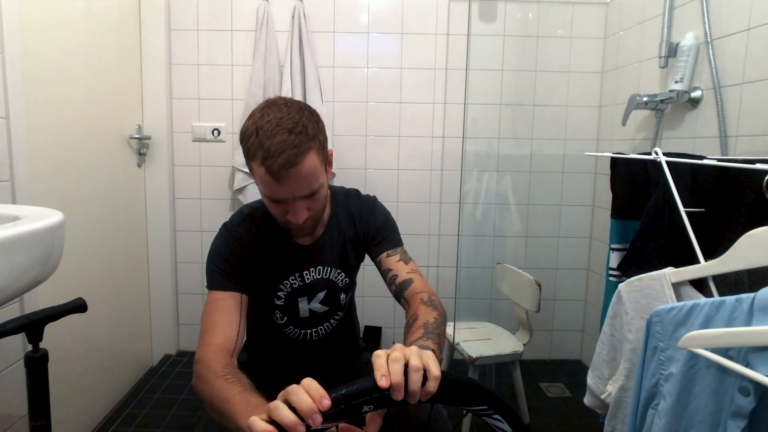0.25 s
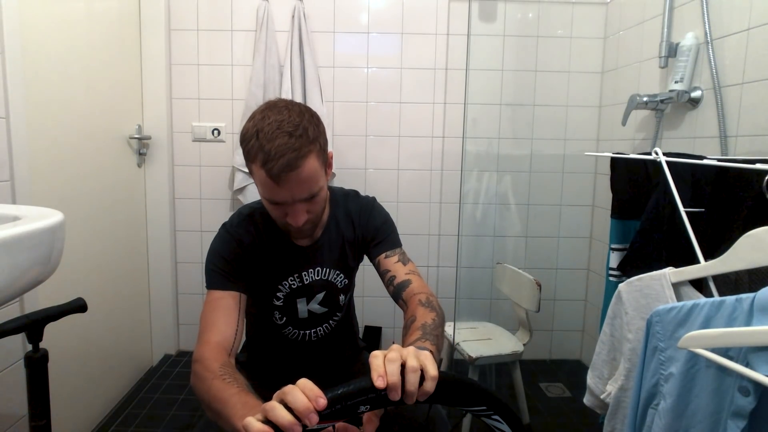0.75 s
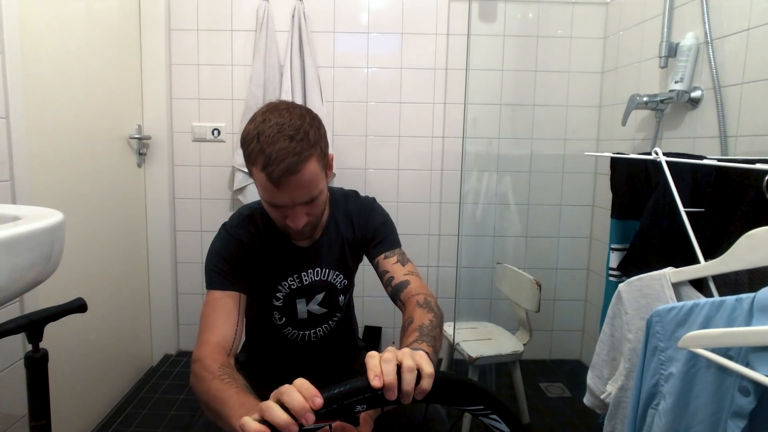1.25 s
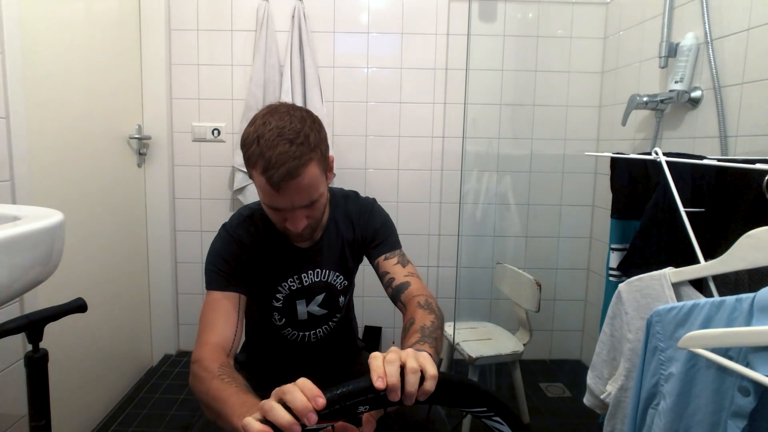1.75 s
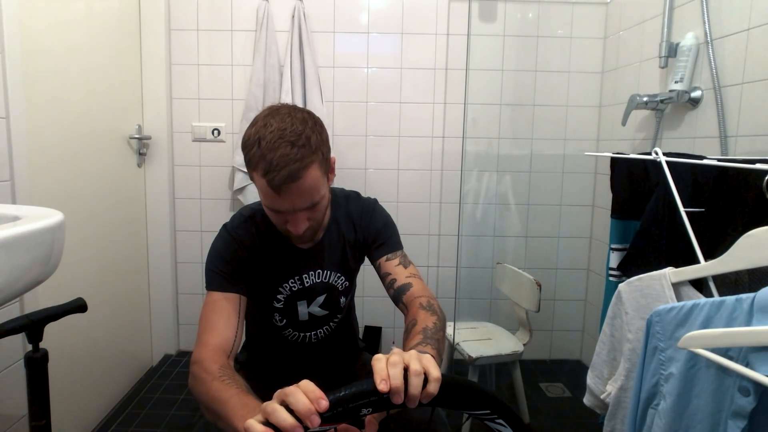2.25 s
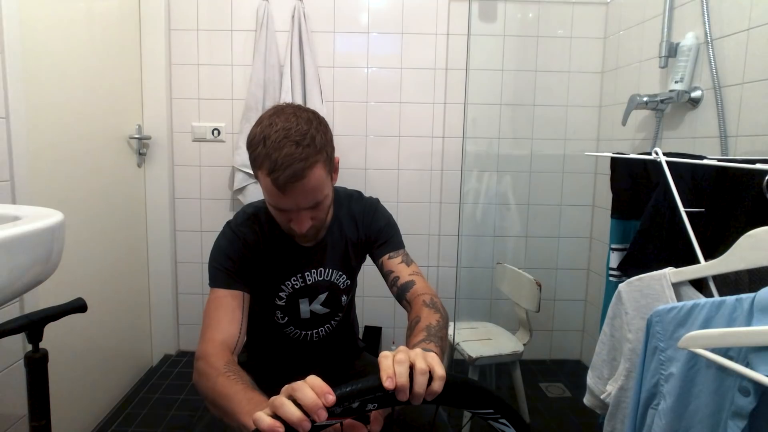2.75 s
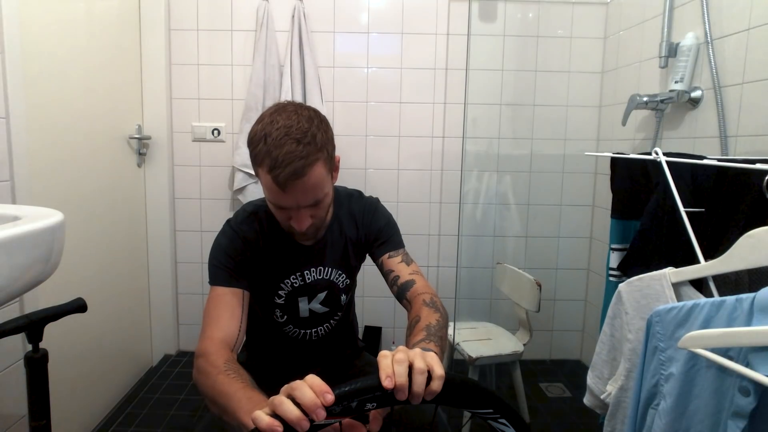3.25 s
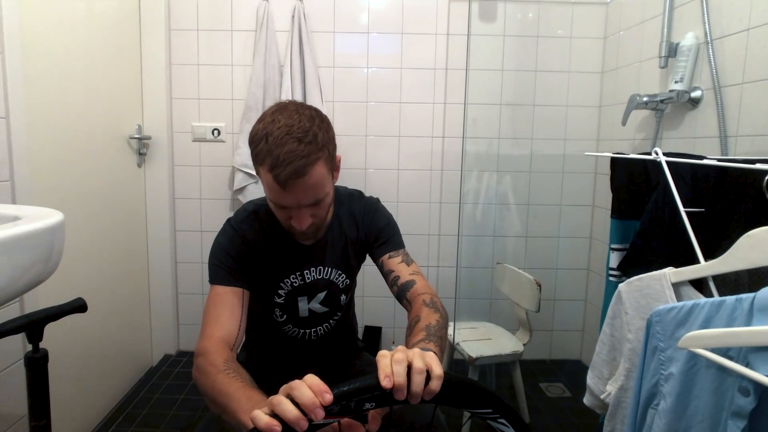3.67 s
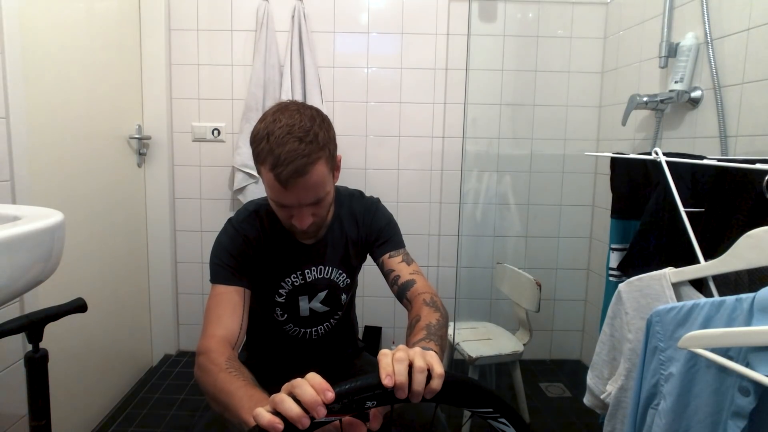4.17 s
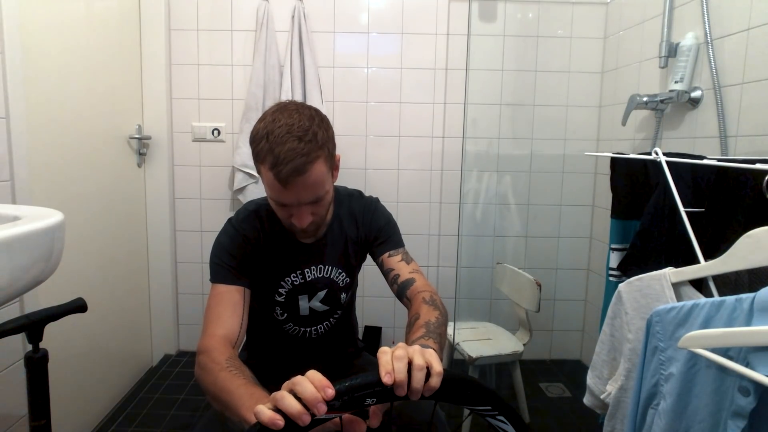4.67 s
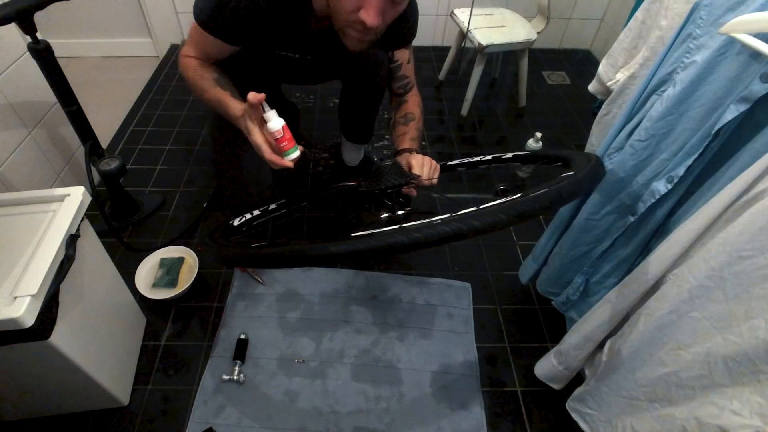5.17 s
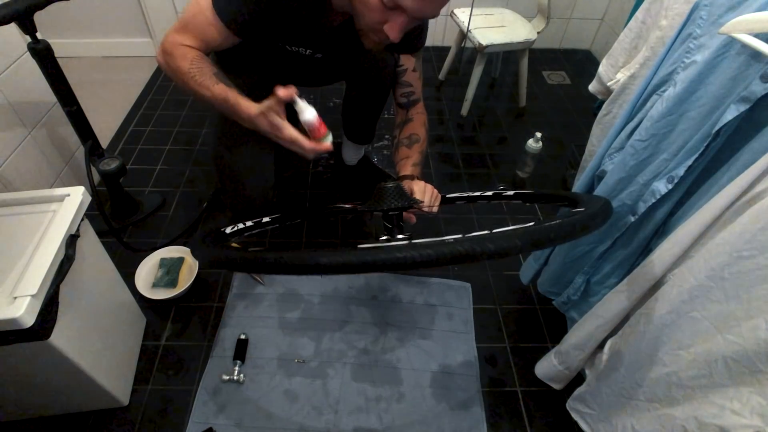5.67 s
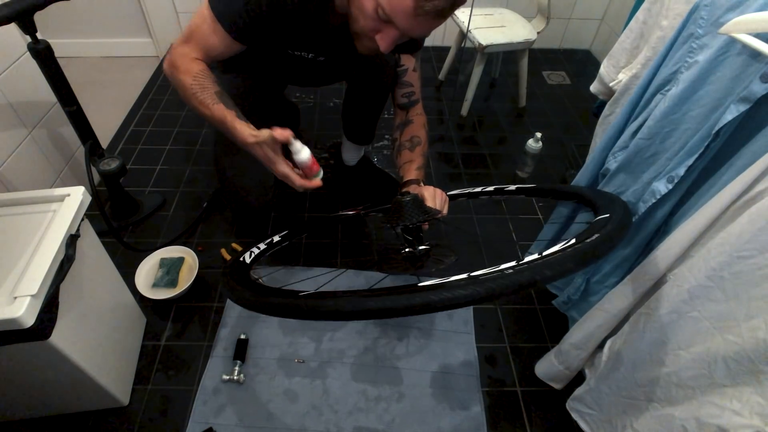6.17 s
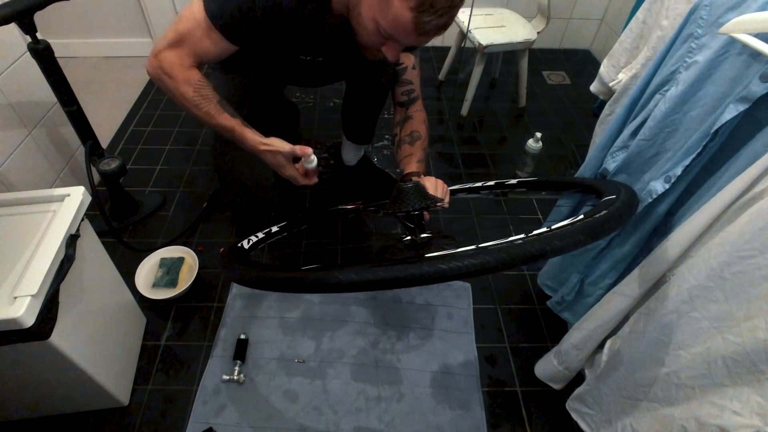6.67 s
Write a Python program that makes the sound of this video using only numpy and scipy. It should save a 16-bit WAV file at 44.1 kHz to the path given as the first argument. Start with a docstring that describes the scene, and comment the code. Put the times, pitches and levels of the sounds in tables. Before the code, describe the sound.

Air spurts, then hisses from a bicycle tyre valve with a sinking whistle, before a small bottle of liquid is shaken in a bathroom.

```python
"""Two short spurts of air leave a bicycle tyre in a tiled bathroom, then a long hiss: turbulence at the
valve, with a breathy whistle of eddies off the pin that climbs as the valve opens and sinks as the tyre
empties. The pin clicks shut and the wheel squeaks faintly as a hand sticks and slips on it. Last, a small
bottle of sealant is shaken, about ten strokes a second: the liquid slaps, trapped air gulps, froth fizzes.
The sound is mono."""
import sys
import numpy as np
from scipy import signal
from scipy.fft import rfft, irfft
from scipy.io import wavfile

SR = 44100
rng = np.random.default_rng(int(sys.argv[2]) if len(sys.argv) > 2 else 0)


def pcm_store(signal):
    """Save signal as 16-bit PCM."""
    levels = np.round(np.clip(np.atleast_2d(signal), -1, 1) * 32767)
    wavfile.write(sys.argv[1], SR, levels.astype(np.int16).T)


N = 305613
TIME = np.arange(N) / SR


def from_db(db):
    """Decibels to gain."""
    return 10 ** (np.asarray(db) / 20)


def rms_one(x):
    """Scale to unit power."""
    return x / np.sqrt(np.mean(x ** 2) + 1e-20)


def automation(points):
    """Draw straight lines through (time, value) points, one value per sample."""
    times, values = np.transpose(points)
    return np.interp(TIME, np.sort(times), values)


def at_hz(points, hz):
    """Read a curve along log frequency."""
    freqs, values = np.transpose(points)
    return np.interp(np.log(np.maximum(hz, 1)), np.log(freqs), values)


def colour(x, spectrum):
    """Shape a signal with an EQ curve; unit power."""
    eq = from_db(at_hz(spectrum, np.fft.rfftfreq(N, 1 / SR)))
    return rms_one(irfft(rfft(x) * eq, N))


def noise(spectrum):
    """Noise shaped by an EQ curve; unit power."""
    return colour(rng.standard_normal(N), spectrum)


def band_noise(length, low_hz, high_hz):
    """Gently band-passed noise; unit power."""
    bandpass = signal.butter(2, [low_hz, high_hz], "band", fs=SR, output="sos")
    return rms_one(signal.sosfilt(bandpass, rng.standard_normal(length)))


def drift(rate_hz):
    """Smooth random modulation up to a given rate; unit power."""
    lowpass = signal.butter(2, rate_hz, fs=SR, output="sos")
    return rms_one(signal.sosfilt(lowpass, rng.standard_normal(N + SR))[SR:])


def gate(start_s, end_s, ramp_s):
    """Fully open between two times, with fades outside them."""
    fade_in = np.clip((TIME - start_s) / ramp_s + 1, 0, 1) ** 2
    fade_out = np.clip((end_s - TIME) / ramp_s + 1, 0, 1) ** 2
    return fade_in * fade_out


def low_cut(x, hz):
    """Roll off the bass, which small things do not radiate."""
    return signal.sosfilt(signal.butter(3, hz, "high", fs=SR, output="sos"), x)


def ring(clicks, hz, t60_s):
    """A unit click sets a sine of height 1 ringing."""
    radius, angle = np.exp(-np.log(1000) / (t60_s * SR)), 2 * np.pi * hz / SR
    return signal.lfilter([0, np.sin(angle)], [1, -2 * radius * np.cos(angle), radius ** 2], clicks + 1e-18)


def strike(hits, modes):
    """Each (time_s, level_db) hit rings all the modes of an object."""
    force = np.zeros(N)
    for time_s, db in hits:
        force[round(time_s * SR)] = from_db(db)
    return sum(from_db(db) * ring(force, hz, t60_s) for hz, db, t60_s in modes)


def add(track, sound, start_s):
    """Mix a short sound in from a given time."""
    start = round(start_s * SR)
    track[start:start + len(sound)] += sound[:N - start]


# EQ of the still room: freq_hz, gain_db
ROOM_TONE_EQ = [(25, -17), (49, 2.5), (70, -2), (150, -4), (400, -6.5), (1500, -10.5), (4000, -22),
                (16000, -31)]
def room_tone(level_db=-68):
    """A very quiet, dark bed of noise."""
    return from_db(level_db) * noise(ROOM_TONE_EQ)


# EQ of the rustle: freq_hz, gain_db
RUSTLE_EQ = [(22, -30), (50, 2), (90, -8), (250, -6.5), (520, -10), (900, -15), (1600, -13.5), (2200, -18),
             (2900, -16.5), (4000, -25.5), (9600, -22), (16000, -31)]
def rustle(level_db=-53, start_s=5.025, swell_s=0.05, unrest_db=1.5):
    """The soft noise of someone moving about swells in and stays."""
    swell = np.sqrt(np.clip((TIME - start_s) / swell_s, 0, 1))
    return from_db(level_db + unrest_db * drift(14)) * noise(RUSTLE_EQ) * swell


# Reverb time of the tiled room: freq_hz, t60_s
TILE_DECAY = [(200, 0.75), (530, 0.48), (1400, 0.45), (3700, 0.39), (9700, 0.3), (15000, 0.2)]
def tile_echoes(predelay_s=0.002):
    """One second of dense echoes whose treble dies first; unit energy."""
    t, hz = TIME[:SR], np.fft.rfftfreq(SR, 1 / SR)
    spectrum, tail = rfft(rng.standard_normal(SR)), np.zeros(SR)
    edges = np.geomspace(20, SR / 2, num=15)
    for low, high in zip(edges, edges[1:]):
        t60_s = at_hz(TILE_DECAY, np.sqrt(low * high))
        band = irfft(spectrum * ((hz >= low) & (hz < high)), SR)
        tail += band * np.exp(-np.log(1000) * t / t60_s)
    tail *= t > predelay_s
    return tail / np.linalg.norm(tail)


def bathroom(x, wet_db, shift_rad=1.4):
    """Direct sound plus echoes, crossfading between two patterns as the source shifts in the hands."""
    angle, wet = shift_rad * drift(3.65), from_db(wet_db)
    first, second = (signal.fftconvolve(x, tile_echoes())[:N] for _ in range(2))
    echoes = np.cos(angle) * first + np.sin(angle) * second
    return (x + wet * echoes) / np.hypot(1, wet)


# Finger scratches: start_s, level_db, pitch_hz, decay_s
SCRATCHES = [(5.196, -46, 3500, 0.0016), (5.203, -49, 6000, .005), (5.28, -44, 2800, 0.003),
             (5.331, -50, 3940, 0.018), (5.358, -48, 10000, 0.017)]
def scratches(spread=1.4):
    """Fingers scrape over the bottle in short, faint rasps."""
    out, t = np.zeros(N), TIME[:SR // 8]
    for start_s, db, hz, decay_s in SCRATCHES:
        rasp = band_noise(len(t), hz / spread, hz * spread)
        add(out, from_db(db) * rasp * np.exp(-t / decay_s), start_s)
    return out


# Fader of the squeak: time_s, level_db
SQUEAK_FADER = [(5.0, -110), (5.012, -56.5), (5.032, -55.5), (5.043, -44), (5.12, -53.5), (5.14, -65),
                (5.17, -110)]
# Modes of the wheel: pitch_hz, gain_db
WHEEL_MODES = [(1362, -1.5), (1464, 2.5), (2250, -17.5), (2794, -19), (3225, -11.5), (8533, -21)]
def wheel_squeak(wobble=0.0038, rough_db=1.5):
    """Skin sticks and slips on the wheel and keeps a few of its modes sounding."""
    warped_time = np.cumsum(1 + wobble * drift(60)) / SR
    modes = sum(from_db(db + rough_db * drift(70)) * np.sin(2 * np.pi * hz * warped_time)
                for hz, db in WHEEL_MODES)
    return rms_one(modes) * from_db(automation(SQUEAK_FADER))


# The hand's hit on the tyre: start_s, force_db
TYRE_HITS = [(.168, -36.5)]
# Modes of the tyre: pitch_hz, gain_db, t60_s
TYRE_MODES = [(139, -30, 0.13), (245, -23.5, 0.15), (353, -2, 0.056), (450, 13.5, 0.013),
              (630, 11.5, 0.0099), (1147, 2.5, 0.057), (1280, -12.5, 0.44)]
def tyre_bump(trim_db=-4):
    """The hand bumps the tyre, which answers with a short knock."""
    return from_db(trim_db) * low_cut(strike(TYRE_HITS, TYRE_MODES), hz=85)


# Clicks of the valve pin: start_s, crack_db, ring_db
PIN_CLICKS = [(.41, -53, -60), (0.426, -42, -54), (.539, -43, -46), (4.807, -37, -45.5)]
# Modes of the pin: pitch_hz, gain_db, t60_s
PIN_MODES = [(1122, 1.5, 0.14), (1740, -6, .15), (1990, 8.5, 0.093), (2487, 6, 0.12)]
def pin_clicks(ring_trim_db=-11, crack_trim_db=-5, decay_s=0.019):
    """The valve pin clicks: a gritty crack over a small ring."""
    hits = [(start_s, ring_db) for start_s, _, ring_db in PIN_CLICKS]
    out, t = from_db(ring_trim_db) * strike(hits, PIN_MODES), TIME[:SR // 20]
    for start_s, crack_db, _ in PIN_CLICKS:
        crack = band_noise(len(t), 1130, 4500) * np.exp(-t / decay_s)
        add(out, from_db(crack_db + crack_trim_db) * crack, start_s)
    return out


SHAKE_FROM_S, PREROLL_S = 5.53, 0.03
def burst(low_hz, high_hz, swell_s, decay_s):
    """A puff of noise that swells to its peak, PREROLL_S after its start, and collapses."""
    t = TIME[:SR // 8] - PREROLL_S
    envelope = np.exp(np.minimum(t, 0) / swell_s - np.maximum(t, 0) / decay_s)
    return band_noise(len(t), low_hz, high_hz) * envelope


# Strokes of the bottle: peak_s, slap_db, pitch_hz, spray_db, gulp_db, decay_s, froth_db
STROKES = [(5.5403, -33.5, 2870, -41.5, -39.5, 0.0049, -34.5), (5.63, -26, 1280, -40.5, -42, 0.0032, -35.5),
           (5.7354, -28, 3100, -34.5, -38.5, 0.002, -35), (5.8136, -33.5, 3070, -49, -69, 0.004, -34),
           (5.9254, -31.5, 1380, -46.5, -44.5, 0.0044, -40), (5.998, -43, 2010, -51, -67, 0.0061, -36.5),
           (6.1133, -27, 2700, -40.5, -53, 0.0025, -39), (6.1956, -26.5, 2280, -43.5, -47, 0.005, -36.5),
           (6.2958, -25, 1440, -41.5, -43.5, 0.0034, -37), (6.3866, -33, 1740, -47, -42, 0.0047, -38),
           (6.4887, -27, 1880, -50, -51, 0.0068, -38), (6.5754, -32, 2800, -49, -58, 0.0063, -39),
           (6.6616, -32.5, 1990, -44, -63, 0.003, -33), (6.7627, -31, 2480, -45.5, -44.5, 0.0055, -43),
           (6.8404, -27.5, 1830, -43.5, -49, 0.0013, -47)]
def slaps(pop_trim_db=-3.5, spray_trim_db=3.5, splash_trim_db=-6, spread=1.23):
    """Sealant slaps the bottle: a pitched pop and fine spray, then a longer, softer splash."""
    out = np.zeros(N)
    for peak_s, slap_db, hz, spray_db, _, decay_s, _ in STROKES:
        swell_s = 1.18 * decay_s
        pop = from_db(slap_db + pop_trim_db) * burst(hz / spread, hz * spread, swell_s, decay_s)
        spray = from_db(spray_db + spray_trim_db) * burst(7100, 11500, swell_s, decay_s)
        splash = from_db(slap_db + splash_trim_db) * burst(410, 3170, swell_s, decay_s=0.011)
        add(out, pop + spray + splash, peak_s - PREROLL_S)
    return out


def gulps(trim_db=7, pitch_hz=311.6, climb_hz_per_s=48, attack_s=0.0023, decay_s=0.014, early_s=0.00608):
    """Trapped air rings low just before each slap, rising as the foam shrinks the pocket."""
    out, t = np.zeros(N), TIME[:SR // 6]
    envelope = (1 - np.exp(-t / attack_s)) * np.exp(-t / decay_s)
    for peak_s, _, _, _, gulp_db, *_ in STROKES:
        hz = pitch_hz + climb_hz_per_s * (peak_s - SHAKE_FROM_S)
        tone = np.sin(2 * np.pi * hz * t * (1 + t))  # each gulp also bends up a little
        swirl = 0.95 * band_noise(len(t), 290, 486)
        add(out, from_db(gulp_db + trim_db) * (tone + swirl) * envelope, peak_s - early_s)
    return out


def churn(crest_s=0.02, rest_db=-50, foam_up_db=10.5, foam_up_s=0.47):
    """Envelope of the froth: it wells up after each stroke, settles, and grows as the sealant foams up."""
    surge = np.zeros(N)
    for peak_s, *_, froth_db in STROKES:
        age = np.maximum(TIME - peak_s, 0) / crest_s
        surge = np.maximum(surge, from_db(froth_db) * age * np.exp(1 - age))
    thinness = np.clip(1 - (TIME - SHAKE_FROM_S) / foam_up_s, 0, 1)
    shaking = gate(SHAKE_FROM_S, TIME[-1], ramp_s=0.0096)
    return from_db(-foam_up_db * thinness) * np.hypot(surge, from_db(rest_db)) * shaking


# EQ of the froth: freq_hz, gain_db
FROTH_EQ = [(150, -7), (290, 5), (400, 2), (700, -0.5), (1300, -4.5), (1900, 3), (3200, 7.5), (4100, -3),
            (5200, -1), (6500, -12.5), (9700, -2.5), (12000, -32), (16000, -23)]
def froth(trim_db=-4, per_s=2600, size_db=6, t60_cycles=12, voices=28):
    """Small bubbles of many sizes burst in the churning sealant."""
    sizes = from_db(size_db * np.minimum(rng.exponential(1, N), 4)) * rng.choice([-1, 1], N)
    clicks = sizes * (rng.random(N) < per_s / SR)
    voice = rng.integers(0, voices, N)
    bubbles = sum(hz * ring(clicks * (voice == k), hz, t60_cycles / hz)
                  for k, hz in enumerate(np.geomspace(450, 14000, voices)))
    return colour(bubbles, FROTH_EQ) * from_db(trim_db) * churn()


def plops(gain_range_db=(-2.5, 3.5), decay_cycles=15.4, bend=3.64, count=70):
    """Larger bubbles pinch off in the churn, each a short note that rises as it nears the surface."""
    out, t = np.zeros(N), TIME[:SR // 16]
    vigour = churn()
    for when, pitch, strength in rng.random((count, 3)):
        start_s = SHAKE_FROM_S + when * (TIME[-1] - SHAKE_FROM_S)
        hz = 1100 * 2.9 ** pitch
        note = np.sin(2 * np.pi * hz * t * (1 + bend * t)) * np.exp(-t * hz / decay_cycles)
        gain = vigour[int(start_s * SR)] * from_db(np.interp(strength, (0, 1), gain_range_db))
        add(out, gain * note, start_s)
    return out


def droplets(softest_db=-41, per_s=38, size_db=4.5, t60_cycles=36, voices=14):
    """Stray drops tick against the plastic, short and bright."""
    sizes = from_db(softest_db + size_db * np.minimum(rng.exponential(1, N), 3))
    clicks = sizes * (rng.random(N) < per_s / SR) * gate(SHAKE_FROM_S, TIME[-1], ramp_s=0.01)
    voice = rng.integers(0, voices, N)
    return sum(ring(clicks * (voice == k), hz, t60_cycles / hz)
               for k, hz in enumerate(np.geomspace(3500, 11000, voices)))


# Big bubbles bursting: peak_s, level_db
SNAPS = [(5.521, -23), (6.077, -22.5), (6.731, -23.5), (6.837, -30), (6.878, -19)]
def snaps(pitch_hz=3040, spread=1.086, snap_trim_db=-4, crack_trim_db=-13, swell_s=0.00095, decay_s=0.0019):
    """A big bubble bursts against the bottle wall: a pitched snap with a broad crack."""
    out = np.zeros(N)
    for peak_s, db in SNAPS:
        snap = from_db(snap_trim_db) * burst(pitch_hz / spread, pitch_hz * spread, swell_s, decay_s)
        crack = from_db(crack_trim_db) * burst(600, 6700, swell_s, decay_s)
        add(out, from_db(db) * (snap + crack), peak_s - PREROLL_S)
    return out


# Presses of the pin, the last three columns added to the flow:
# start_s, end_s, flow_db, rush_db, whistle_db, sizzle_db
PRESSES = [(0, 0.18, -29.5, -13.5, -12.5, -5), (.44, .5, -50.5, -9.5, 2.5, 5.5),
           (0.717, 4.81, -30.5, -22.5, -7, -3)]
# The finger wavers on the pin, then rests: time_s, flow_change_db
FINGER_RIDE = [(.02, 5), (.1, -2.5), (.72, -2.5), (.82, -2.5), (1.06, 6.5), (1.11, -.5), (1.19, 5.5),
               (1.27, 0), (1.41, 5.5), (1.52, -0.5), (1.72, -1), (2.28, 0), (2.39, 0.5), (2.54, 0),
               (2.9, 0), (3.75, 0), (4.2, -1.5), (4.81, -1)]
# Speed of the jet, heard as its edge tone at the pin: time_s, pitch_hz
JET_PITCH = [(.028, 11900), (.036, 14480), (.3, 15000), (.41, 5887), (.72, 4317), (.87, 5180), (.92, 3834),
             (1.058, 3395), (1.08, 15370), (1.32, 11370), (1.43, 11670), (1.48, 13900), (1.8, 15560),
             (2.22, 14900), (2.235, 11930), (2.37, 10800), (2.5, 10580), (2.78, 7670), (3.2, 6416),
             (3.35, 5610), (4.4, 4495), (4.46, 3606), (4.68, 3300), (4.81, 2147)]
DRAIN_FROM_S, EMPTY_AT_S = 1.17, 6.31  # the tyre's pressure runs down evenly between these
SHRILL_FROM_HZ, VALVE_RAMP_S = 6560, 0.029
def airflow(trim_db, fast_db, fast_hz, pressure_power, finger_depth):
    """Gain of a jet layer: it rides the finger, fades with pressure and shifts by fast_db up to fast_hz."""
    opened = sum(from_db(flow_db + trim) * gate(start_s, end_s, VALVE_RAMP_S)
                 for (start_s, end_s, flow_db, *_), trim in zip(PRESSES, np.broadcast_to(trim_db, 3)))
    pressure = np.clip((EMPTY_AT_S - TIME) / (EMPTY_AT_S - DRAIN_FROM_S), 0.01, 1)
    speed = np.clip((automation(JET_PITCH) - SHRILL_FROM_HZ) / (fast_hz - SHRILL_FROM_HZ), 0, 1)
    ride_db = finger_depth * automation(FINGER_RIDE) + fast_db * speed
    return opened * pressure ** pressure_power * from_db(ride_db)


# EQs of the jet's bright hiss, midrange rush and top-end sizzle: freq_hz, gain_db
HISS_EQ = [(1200, -48), (2200, -17), (3400, -14.5), (4300, -25), (5500, -8.5), (6650, -7.5), (7300, 1),
           (7900, -1), (9400, 1), (10700, -2.5), (11400, -5.5), (13200, -9.5), (16000, -12)]
RUSH_EQ = [(25, -36), (60, -39), (110, -15.5), (250, -4.5), (600, -16), (1000, -3.5), (1600, 4),
           (2500, 4.5), (3050, 4), (3400, 13.5), (3750, 5), (4200, -1), (6000, 2), (9000, -38)]
SIZZLE_EQ = [(60, -28.5), (300, -24.5), (4500, -14), (7000, -18.5), (9000, 2.5), (11000, 3), (13200, 0),
             (14600, 0.5), (16000, 3)]
def jet(hiss_trim_db=4.5, rush_trim_db=4.5, flutter_db=0.56):
    """Turbulence at and behind the orifice makes three layers of noise while the pin is pressed."""
    *_, rush_db, _, sizzle_db = np.transpose(PRESSES)
    hiss = noise(HISS_EQ) * airflow(
        hiss_trim_db, fast_db=-1, fast_hz=10800, pressure_power=1.47, finger_depth=1)
    rush = noise(RUSH_EQ) * airflow(
        rush_db + rush_trim_db, fast_db=3.5, fast_hz=12400, pressure_power=1.53, finger_depth=0.085)
    sizzle = noise(SIZZLE_EQ) * airflow(
        sizzle_db, fast_db=14, fast_hz=8160, pressure_power=2.02, finger_depth=0.64)
    return (hiss + rush + sizzle) * from_db(flutter_db * drift(58))


def whistle(core_width=0.068, skirt_width=0.17, wander=0.016, lock_hz=9500, sputter_db=1.1, surge_db=1.77):
    """Eddies shed from the pin make a breathy tone: a narrow core of noise inside a wider skirt."""
    hz = automation(JET_PITCH)
    *_, whistle_db, _ = np.transpose(PRESSES)
    level = airflow(whistle_db, fast_db=18.5, fast_hz=10910, pressure_power=0.83, finger_depth=1)
    phase = 2 * np.pi * np.cumsum(hz * (1 + wander * drift(29.88))) / SR
    # a fast jet locks on to the pin: above lock_hz the tone grows no wider
    eddy_time = np.cumsum(np.minimum(hz / lock_hz, 1)) / SR

    def eddies(width):
        """A band of noise around the pitch, its width a share of that pitch."""
        cos_gain, sin_gain = (np.interp(eddy_time, TIME, drift(width * lock_hz)) for _ in range(2))
        return cos_gain * np.cos(phase) + sin_gain * np.sin(phase)

    tone = rms_one(eddies(core_width) + 0.75 * eddies(skirt_width))
    flicker = from_db(sputter_db * drift(120) + surge_db * drift(6))
    return low_cut(tone * level * flicker, hz=3700)


def scene():
    """Valve, hands and bottle each get their own send to the tiles, the hands wettest."""
    valve = bathroom(jet() + whistle(), wet_db=-3.5)
    hands = bathroom(pin_clicks() + tyre_bump() + wheel_squeak() + scratches(), wet_db=0.5)
    bottle = bathroom(slaps() + snaps() + gulps() + froth() + plops() + droplets(), wet_db=-4)
    mono = valve + hands + bottle + rustle() + room_tone()
    return np.array([mono, mono])


def record(dry, cutoff_hz=15850):
    """A steep high cut takes off the very top."""
    lowpass = signal.firwin(601, cutoff_hz, fs=SR, window="blackman")
    return signal.fftconvolve(dry, lowpass[None], "same", axes=1)


dry = scene()
out = record(dry)
pcm_store(out)
```